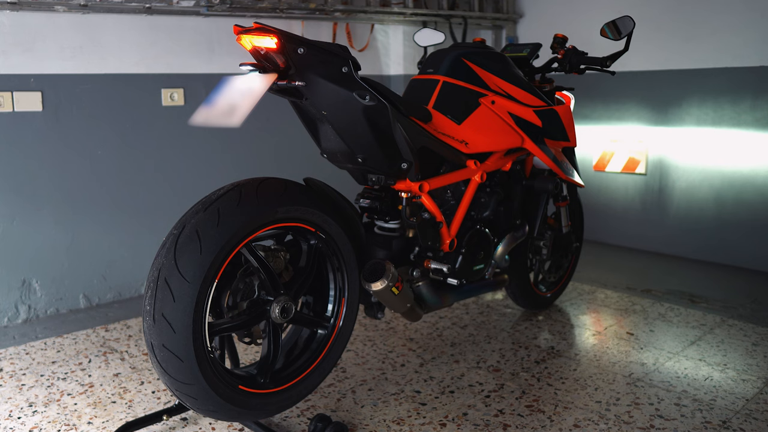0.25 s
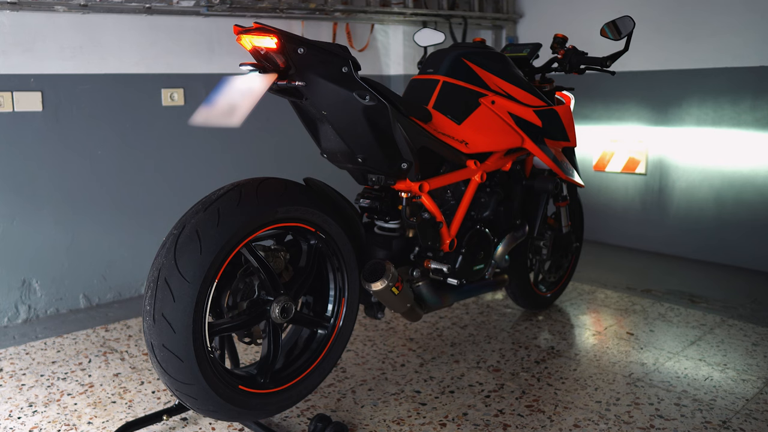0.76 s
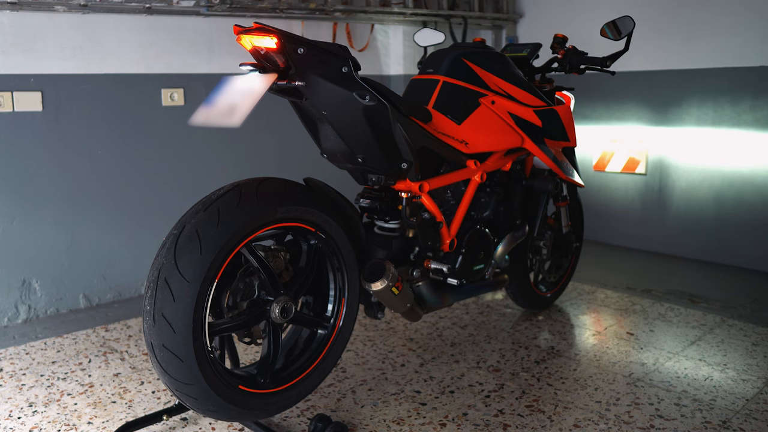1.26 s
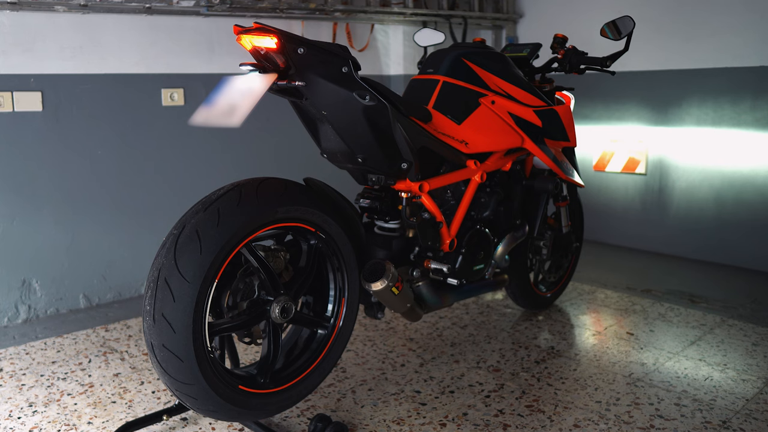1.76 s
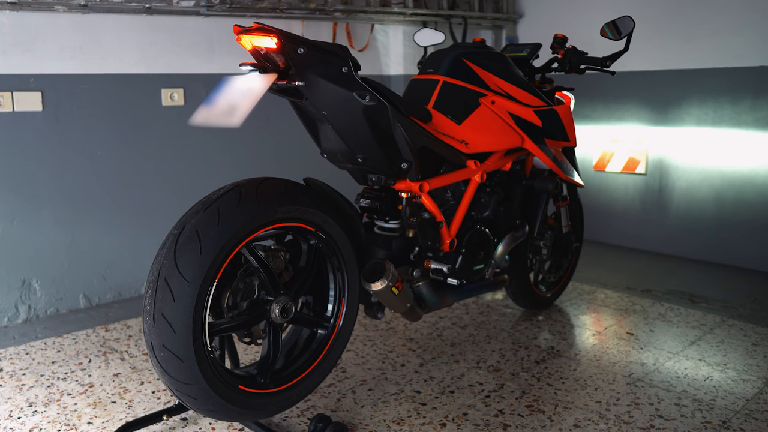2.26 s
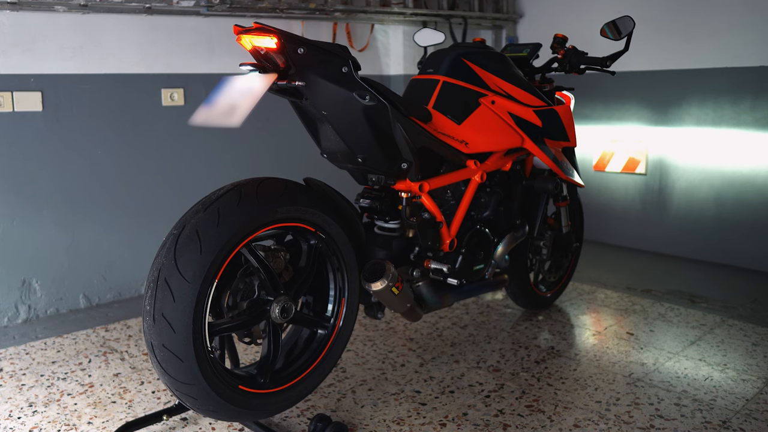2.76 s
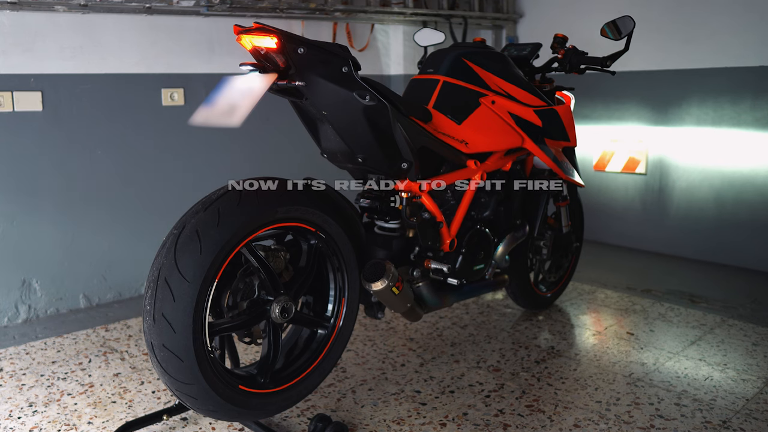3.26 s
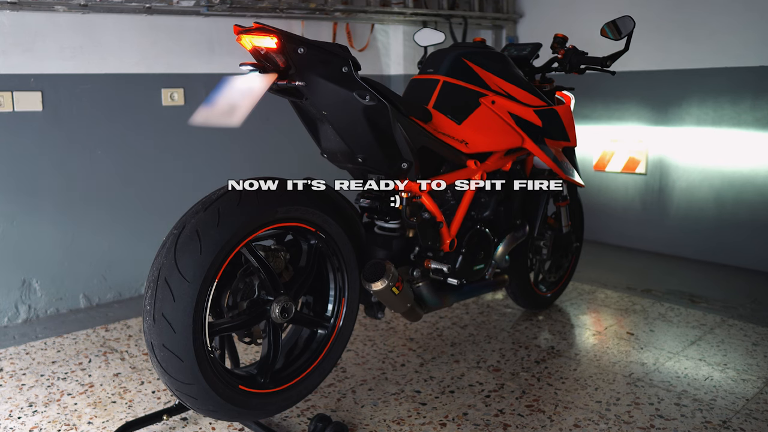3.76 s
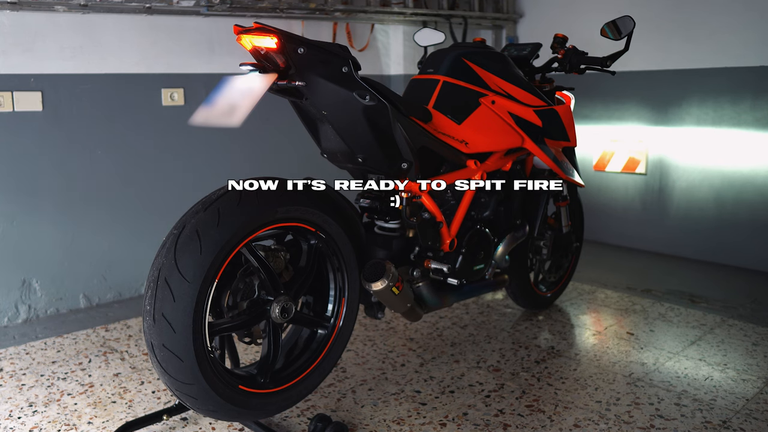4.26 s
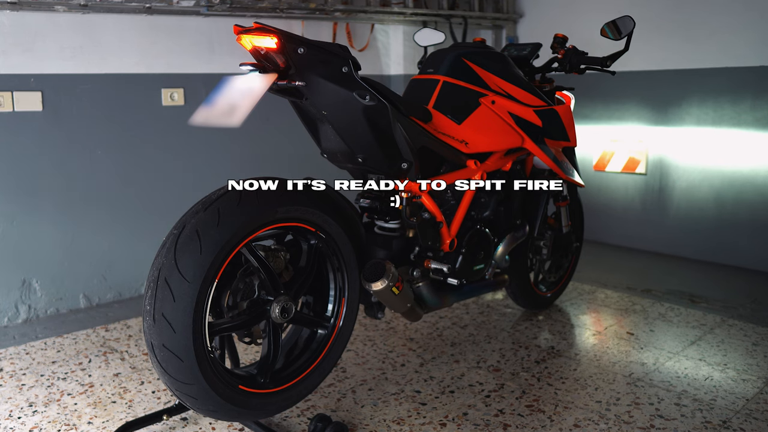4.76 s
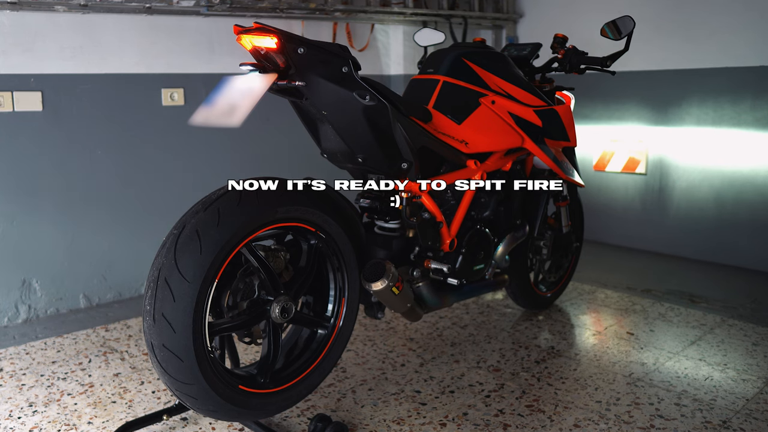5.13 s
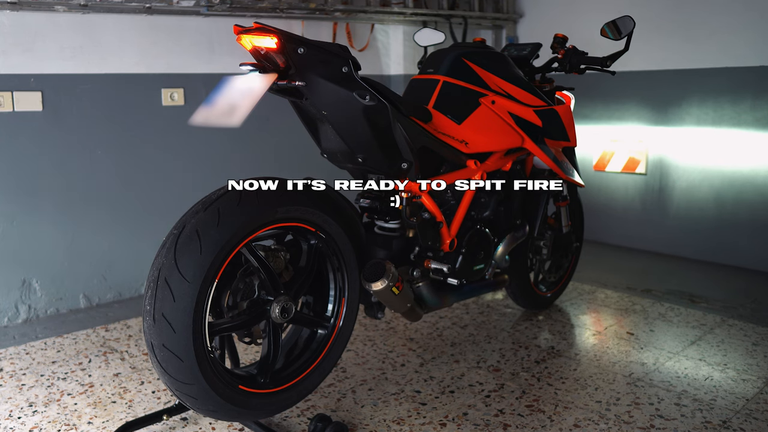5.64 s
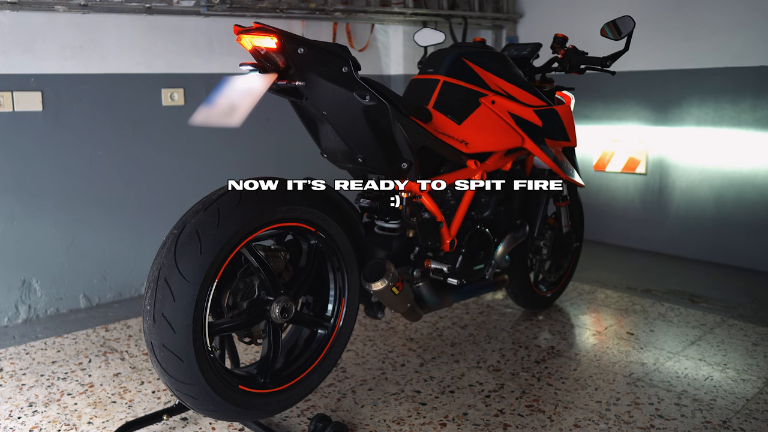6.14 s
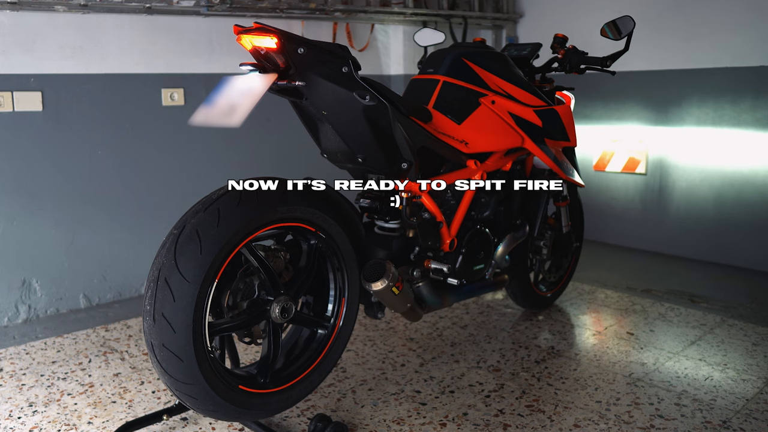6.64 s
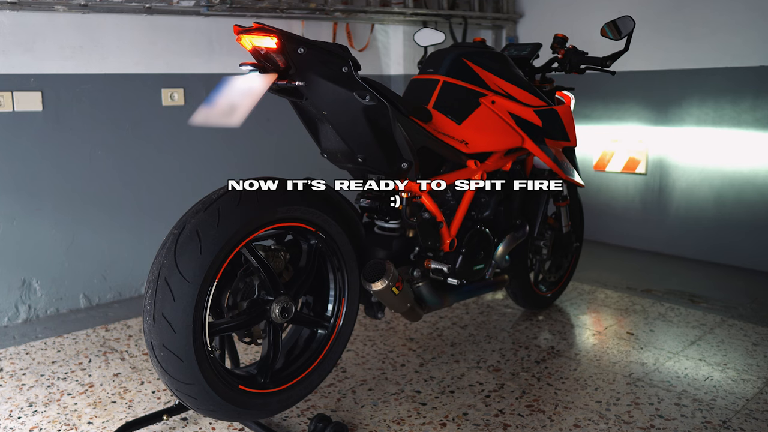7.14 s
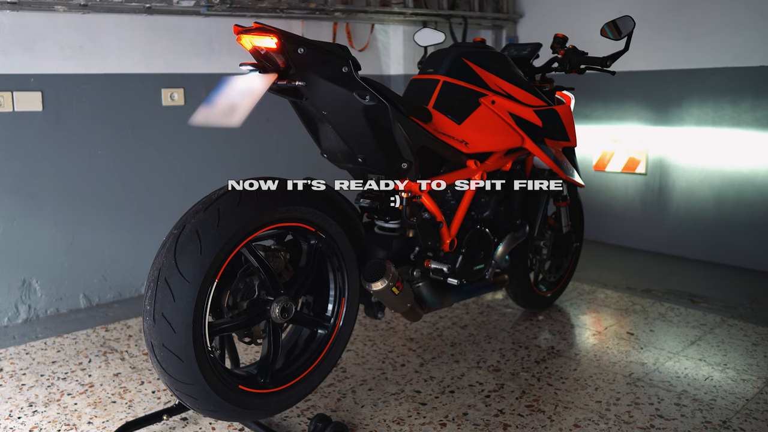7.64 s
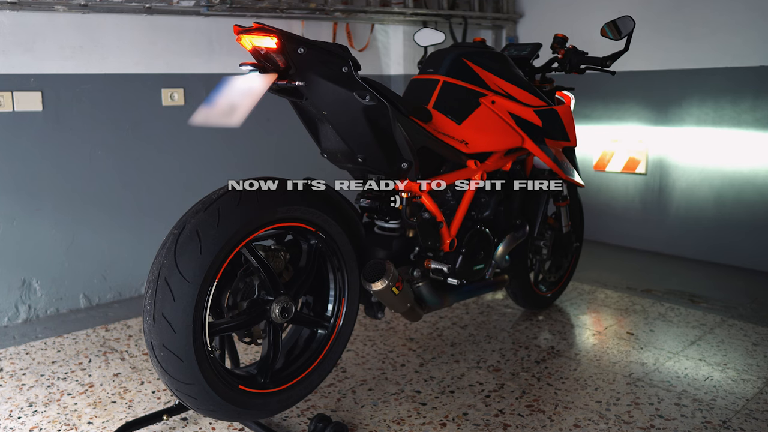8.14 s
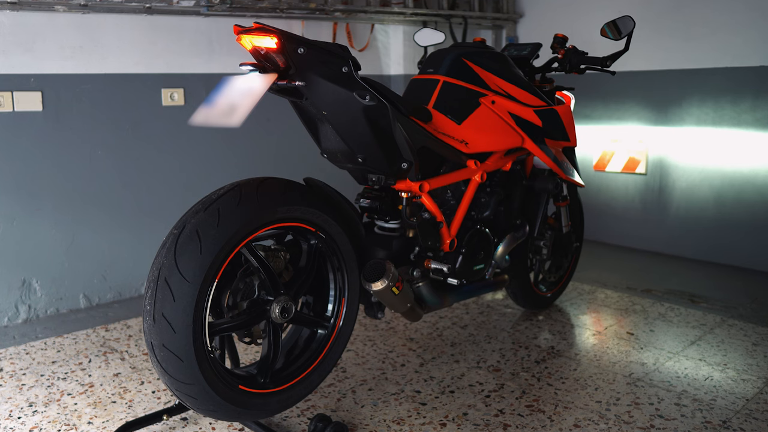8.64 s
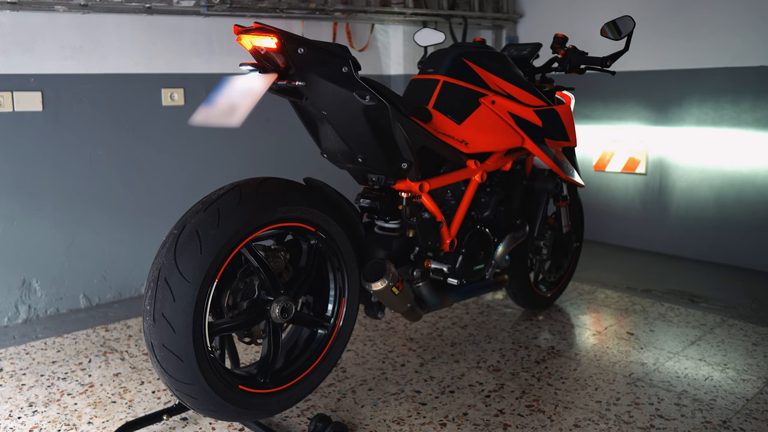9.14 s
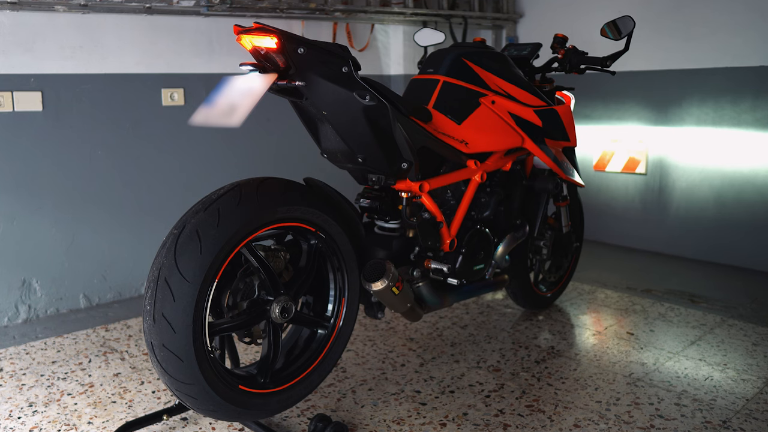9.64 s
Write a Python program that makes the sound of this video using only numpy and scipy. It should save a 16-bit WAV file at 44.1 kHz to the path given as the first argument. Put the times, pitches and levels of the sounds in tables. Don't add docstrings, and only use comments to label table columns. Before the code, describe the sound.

Close stereo pickup of a big motorcycle idling indoors. The cold engine opens at full strength, its uneven double beats merging into a rapid bassy throb that makes the room boom, under metallic clatter and valve ticks. An abrupt cut brings the warm engine, clearly softer and gently hunting in speed, alternating strong and weak ticks with short hollow pipe barks and softer rumble. It continues steadily to the end.

```python
import sys
import numpy as np
from scipy import signal
from scipy.fft import rfft, irfft, next_fast_len
from scipy.io import wavfile
from scipy.ndimage import uniform_filter1d

SR = 44100
rng = np.random.default_rng(int(sys.argv[2]) if len(sys.argv) > 2 else 0)


def ratio_of_db(decibels):
    return 10 ** (np.asarray(decibels, float) / 20)


def unload_wav(signal):
    wavfile.write(
        sys.argv[1],
        SR,
        np.round(np.clip(np.atleast_2d(signal).T, -1, 1) * 32767).astype(np.int16),
    )


N = 436572
TIME = np.arange(N) / SR


def unit(x):
    return x / np.sqrt(np.mean(x ** 2) + 1e-20)


def along(points, hz):
    f, v = np.transpose(points)
    return np.interp(np.log(hz + 1), np.log(f + 1), v)


def filtered(x, response):
    m = next_fast_len(N + SR // 2, True)
    return irfft(rfft(x, m) * response(np.fft.rfftfreq(m, 1 / SR)), m)[..., :N]


def modes(table):
    return lambda f: sum(sign * ratio_of_db(db) * 1j * f * w / (c * c - f * f + 1j * f * w)
                         for c, w, db, sign in table)


def noise(response):
    # Hz, left-right likeness from 0 to 1
    alike = [(60, 0.34), (130, 0.73), (290, 0.94), (640, 0.83), (1410, 0.76), (3100, 0.74), (6820, 0.48),
             (15000, 0.27)]

    def spread(hz):
        angle = np.arccos(np.clip(along(alike, hz), -1, 1)) / 2
        return response(hz) * [np.cos(angle), np.sin(angle)]

    mid, side = filtered(rng.standard_normal((2, N)), spread)
    return unit(np.array([mid + side, mid - side]))


def crank(speed, start):
    turned = np.cumsum(np.interp(TIME, *np.transpose(speed))) / SR
    return turned - turned[round(speed[0][0] * SR)] + start


def beats(cycle, pattern, scatter_db, jitter_s):
    turns = np.arange(np.floor(cycle[0]), cycle[-1])[:, None]
    where, db = np.transpose(pattern)
    luck = rng.standard_normal((2, len(turns), len(where)))
    at = np.interp(turns + where, cycle, np.arange(N), left=-SR, right=-SR)
    at = at + jitter_s * SR * luck[0]
    ok = (at >= 0) & (at < N - 1)
    return np.bincount(np.round(at[ok]).astype(int), ratio_of_db(db + scatter_db * luck[1])[ok], N)


def burst(x, rise_s, t60):
    t = np.arange(SR // 5) / SR
    envelope = ratio_of_db(-60 * t / t60) * (1 - np.exp(-t / rise_s))
    return np.abs(signal.fftconvolve(x, envelope)[:N])


def garage(x):
    # Hz, time to fall by 60 dB in seconds
    decay = [(150, 0.65), (500, 0.33), (3000, 0.29), (12000, 0.22)]
    hz, t, z = signal.stft(rng.standard_normal((2, SR // 2)), SR, nperseg=256)
    fading = z * ratio_of_db(-60 * t / along(decay, hz)[:, None])
    tail = signal.istft(fading, SR, nperseg=256)[1]
    return signal.fftconvolve(np.broadcast_to(x, (2, N)), tail / np.linalg.norm(tail[0]), axes=1)[:, :N]


def case_clatter(cycle, clatter, casing, rattle):
    teeth = beats(cycle, [(k / 9, 0) for k in range(9)], scatter_db=3.5, jitter_s=0.0012)
    ring = noise(lambda hz: ratio_of_db(along(clatter, hz)) * (1 + np.abs(modes(casing)(hz))))
    return unit((1 + rattle * unit(burst(teeth, .0011, 0.044))) * ring)


def valve_ticks(seats, casing):
    # Hz, level in dB per Hz
    tick = [(1210, -39), (2510, -8.5), (3410, -3.5), (4210, -4.5), (5110, -4), (6510, -13.5), (9010, -15),
            (15900, -25.5)]
    metal = noise(lambda hz: ratio_of_db(along(tick, hz)) * (1 + 2 * np.abs(modes(casing)(hz))))
    return unit(burst(seats, .0025, 0.014) * metal)


def valve_spits(seats):
    # Hz, level in dB per Hz
    spit = [(4010, -30.5), (7010, -4.5), (10100, -1), (13100, 0), (15900, -12)]
    return unit(burst(seats, .0025, .019) * noise(lambda hz: ratio_of_db(along(spit, hz))))


def engine(cycle, valves, clatter, casing, clatter_db, tick_db, spit_db, uneven_db, rattle, wet_db,
           strength=1):
    seats = beats(cycle, valves, uneven_db, jitter_s=0.00077)
    ticks = ratio_of_db(tick_db) * valve_ticks(seats, casing)
    spits = ratio_of_db(spit_db) * valve_spits(strength * seats)
    cases = ratio_of_db(clatter_db) * case_clatter(cycle, clatter, casing, rattle)
    return cases + ticks + spits + ratio_of_db(wet_db) * garage(ticks + spits)


def lope(cycle):
    swaps_s = [5.7, 7.4]
    turn = np.floor(cycle + .2) + np.searchsorted(swaps_s, TIME)
    return ratio_of_db(np.where(turn % 2, 3, -3))


def bark(cycle):
    # position in the cycle, level in dB
    blows = [
        (-.06, -1.5),
        (.57, 0),
    ]
    # Hz, width in Hz, level in dB, polarity
    pipe = [(319.5, 30.5, 4.5, 1), (280, 53, -5, -1.3), (421, 60, -10.5, -0.91), (530, 100, -23.5, 0.93)]

    def voice(hz):
        highpass = (1j * hz / (200 + 1j * hz)) ** 2
        return modes(pipe)(hz) * highpass / (1 + 1j * hz / 800) ** 4

    kicks = beats(cycle, blows, scatter_db=1.5, jitter_s=.0004)
    return ratio_of_db(-39.5) * unit(filtered(kicks, voice))


def gas_puffs(firings, puff, gate):
    swell = 1 + gate * unit(burst(firings, 0.0032, 0.4))
    return unit(swell * noise(lambda hz: ratio_of_db(along(puff, hz))))


def booming(speed, tuning, gaps):
    order, full_db, best_hz, tolerance_hz, lag_s = tuning
    off_hz = np.round(order) * np.interp(TIME - lag_s, *np.transpose(speed)) - best_hz
    loss_db = np.minimum(10 * np.log10(1 + (off_hz / tolerance_hz) ** 4), 8.5)
    return full_db - loss_db - sum(db * np.exp(-((TIME - s) / half) ** 2) for s, half, db in gaps)


def boom(firings, mode, level_db):
    hum = filtered(firings, lambda hz: modes([mode])(hz) / (1 + ((hz - mode[0]) / 9) ** 4))
    power = uniform_filter1d(uniform_filter1d(hum ** 2, size=SR // 13), size=SR // 26)
    return ratio_of_db(level_db) * hum / np.sqrt(np.abs(power) + .01 * np.mean(power))


def exhaust(firings, main, weaker, levels, puff, modes_db, wet_db, puff_db, gate):
    hum = sum(boom(firings, mode, level) for mode, level in zip(main, levels))
    body = unit(filtered(firings, lambda hz: modes(weaker)(hz) / (1 + 1j * hz / 800) ** 4))
    walls = garage(filtered(body, lambda hz: hz ** 2 / (hz ** 2 + 200 ** 2)))
    gas = gas_puffs(firings, puff, gate)
    return hum + ratio_of_db(modes_db) * (body + ratio_of_db(wet_db) * walls) + ratio_of_db(puff_db) * gas


def cold():
    # time in seconds, speed in four-stroke cycles a second
    speed = [(0.0, 13.948), (0.417, 13.6), (0.679, 14.018), (0.841, 13.524), (0.961, 13.741),
             (2.153, 13.703), (2.354, 14.071), (2.521, 13.525), (3.192, 13.952)]
    # Hz, width in Hz, level in dB, polarity
    main = [(109.3, 2.6, 0, -1), (125.2, 2.8, 0, -1)]
    # Hz, width in Hz, level in dB, polarity
    weaker = [(42.4, 6.9, -8.5, 0.65), (66.1, 8.1, 2, 0.64), (97, 2.9, -2.5, 0.93),
              (133.3, 14, -6.5, -0.63), (141, 15, -16, 0.57), (173.4, 7.1, -10.5, -1.58),
              (207.5, 8.2, -9, 0.82), (235.7, 6.3, -7.5, -0.65), (276.8, 10, 2.5, 0.52),
              (301, 9.3, -14, -1.4), (322, 13, -21.5, 1), (366.9, 5.5, -9, -1.62), (412, 5.1, -10.5, 1),
              (481, 19, -19.5, -0.66), (496.3, 5.7, -18, 0.76), (539, 9.9, -17, -0.97), (600, 4.6, -23, 1),
              (641, 11, -23.5, -0.86)]
    # order, full dB, best pitch in Hz, tolerance in Hz, lag in s
    tuning = [(8, -12.5, 107.3, 4.6, .1), (9, -9.5, 124.8, 2.8, .15)]
    # time in s, half length in s, depth in dB
    lower_gaps = [
        (0.22, 0.069, 3),
        (0.787, 0.12, 6),
        (1.157, 0.093, 10),
        (2.465, 0.095, 13),
        (2.918, 0.11, 4),
    ]
    upper_gaps = [
        (0, .08, 12),
        (1.005, 0.037, 27),
        (1.4, .11, 4.3),
        (1.754, 0.052, 10),
        (2.193, .066, 4.5),
        (2.745, 0.054, 9.6),
    ]
    # Hz, level in dB per Hz
    puff = [(21, -50.5), (35, -23), (65, -20.5), (102, -5), (124, -2.5), (148, -2.5), (179, -19.5),
            (287, -17.5), (329, -23.5), (523, -39.5), (900, -58), (1170, -87), (1980, -120)]
    # position in the cycle, level in dB
    valves = [
        (-.033, 0),
        (.15, -10),
        (.362, -4),
        (.68, -14),
    ]
    # Hz, level in dB per Hz
    clatter = [(380, -22.5), (650, -1), (743, -4.5), (945, -8), (1140, -8.5), (1300, -9), (2100, -10.5),
               (2540, -15), (2980, -16), (3360, -13), (3790, -18), (5150, -16.5), (6290, -21),
               (12600, -28.5), (15800, -31)]
    # Hz, width in Hz, dB over the clatter, polarity
    casing = [(850, 25, 8.5, 0.019), (1143, 23, 6.5, -1.2), (1655, 44, 25, 0.043), (2050, 170, 0.5, -1),
              (3380, 470, 1, 0.46), (5060, 270, -26, 0.13)]

    cycle = crank(speed, start=-.1116)
    firings = beats(cycle, [(-.037, 0), (.382, -1.2)], scatter_db=1.1, jitter_s=.0002)
    levels = [booming(speed, tuned, gaps) for tuned, gaps in zip(tuning, (lower_gaps, upper_gaps))]
    works = engine(cycle, valves, clatter, casing, clatter_db=-42.5, tick_db=-52, spit_db=-61.5,
                   uneven_db=2.0, rattle=0.46, wet_db=-2.5)
    return works + exhaust(firings, main, weaker, levels, puff, modes_db=-18.5, wet_db=-3.5,
                           puff_db=-28, gate=0.41)


def warm():
    # time in seconds, speed in four-stroke cycles a second
    speed = [(3.192, 12.084), (3.498, 11.925), (3.834, 12.569), (4.384, 12.326), (4.734, 12.551),
             (5.467, 12.646), (5.841, 12.344), (6.357, 12.979), (6.619, 12.592), (7.235, 12.273),
             (7.479, 12.772), (7.662, 13.012), (7.967, 12.726), (8.501, 12.96), (8.603, 12.745),
             (9.155, 12.529), (9.362, 12.239), (9.9, 12.154)]
    # Hz, width in Hz, level in dB, polarity
    main = [(124.7, 2.6, 0, 1), (152.1, 3.4, 0, 1)]
    # Hz, width in Hz, level in dB, polarity
    weaker = [(49, 18, -12, 0.56), (72.7, 14, -12.5, -1.09), (82, 7, -15, 0.4), (104.2, 10.2, 3, 0.43),
              (171, 5.6, -8, -0.5), (209.3, 11, -13, 0.32), (225, 4.4, -30.5, -0.96),
              (294.4, 3.1, -23.5, -1.7), (316.3, 8.8, -22.5, 0.87), (329.8, 8.3, -18.5, -0.85),
              (354.7, 8.9, -19.5, 0.55), (413, 27, -27, -0.62), (439, 13, -25, 0.49), (491, 11, -29, -0.57),
              (515, 11, -34.5, 0.91), (550, 21, -36, -0.67), (644, 16, -40.5, 0.2)]
    # order, full dB, best pitch in Hz, tolerance in Hz, lag in s
    tuning = [(10, -17, 124.2, 3.76, 0.17), (12, -26.5, 152.5, 3.8, 0.036)]
    # time in s, half length in s, depth in dB
    lower_gaps = [(3.443, .082, 9.4), (4.552, .2, 1.7), (6.399, .053, 13), (7.28, 0.066, 2.8),
                  (7.651, 0.018, 11), (7.81, 0.035, 8), (8.15, 0.04, 7), (8.454, 0.15, 7.4),
                  (9.055, .06, 16), (9.57, 0.12, 7.4), (9.9, 0.077, 13)]
    upper_gaps = [(4.07, .05, 6), (4.6, 0.09, 6.6), (5.015, 0.04, 5.6), (5.797, 0.03, 5.5),
                  (6.45, 0.049, 6), (6.907, 0.041, 9.9), (7.17, 0.034, 6), (7.75, 0.07, 6.3),
                  (8.526, 0.054, 9.4), (9.15, 0.08, 7.1)]
    # Hz, level in dB per Hz
    puff = [(21, -53.5), (35, -29.5), (65, -13), (104, -10.5), (129, 5), (152, 0), (199, -9.5),
            (248, -26.5), (320, -11.5), (409, -25.5), (900, -60.5), (1170, -80), (1980, -120)]
    # position in the cycle, level in dB
    valves = [
        (-.035, 0),
        (.13, -14),
        (.28, -15),
        (.568, -5.5),
    ]
    # Hz, level in dB per Hz
    clatter = [(380, -25.5), (650, 3), (743, -7.5), (1080, -5.5), (1280, -7), (2050, -4.5), (2410, -12.5),
               (3140, -12), (3940, -14.5), (5220, -17.5), (6630, -22.5), (9260, -28.5), (11600, -27),
               (15200, -38), (15800, -44)]
    # Hz, width in Hz, dB over the clatter, polarity
    casing = [(825, 41, -0.5, 0.61), (1080, 130, -0.5, -0.72), (1630, 72, -3, 0.65), (2034, 72, 0, -0.78),
              (3130, 220, 1.5, 0.74), (3990, 300, -0.5, -0.76), (5130, 250, -4.5, 0.88)]

    cycle = crank(speed, start=-.6033)
    firings = beats(cycle, [(.0126, 0), (.608, -1.1)], scatter_db=1.7, jitter_s=.0004)
    levels = [booming(speed, tuned, gaps) for tuned, gaps in zip(tuning, (lower_gaps, upper_gaps))]
    works = engine(cycle, valves, clatter, casing, clatter_db=-52.0, tick_db=-63.5, spit_db=-72,
                   uneven_db=1.5, rattle=0.62, wet_db=-8, strength=lope(cycle))
    pipe = exhaust(firings, main, weaker, levels, puff, modes_db=-28.5, wet_db=-5.5,
                   puff_db=-33, gate=0.12)
    return works + bark(cycle) + pipe


def scene():
    # Hz, left minus right in dB
    left = [(60, -2.0), (110, -2.5), (200, -2.5), (380, -2.5), (700, -0.5), (1290, -2.0), (2380, -3.0),
            (4400, -1.5), (8120, -1.0), (15000, 1.0)]
    after = np.clip((TIME - 3.1915) / .001, 0, 1)
    both = (1 - after) * cold() + after * warm()

    def microphone(hz):
        balance = ratio_of_db(np.array([[.5], [-.5]]) * along(left, hz))
        return balance * hz ** 2 / (hz ** 2 + 22 ** 2)

    return filtered(both, microphone)


def low_pass(x):
    return signal.sosfilt(signal.butter(12, 16080, fs=SR, output="sos"), x)


def record(dry):
    clipped = dry / (1 + np.abs(dry) ** 30) ** (1 / 30)
    return low_pass(clipped)


dry = scene()
out = record(dry)
unload_wav(out)
```